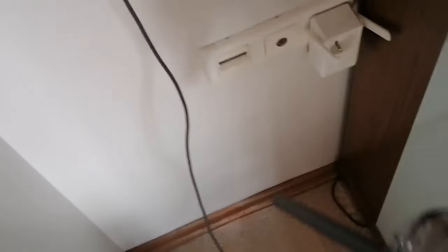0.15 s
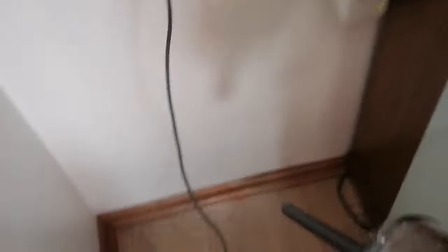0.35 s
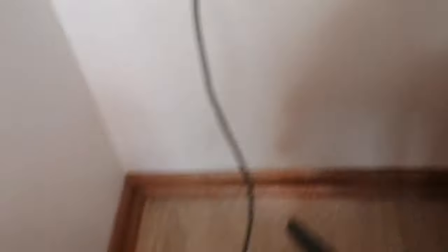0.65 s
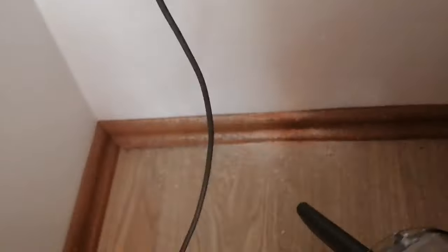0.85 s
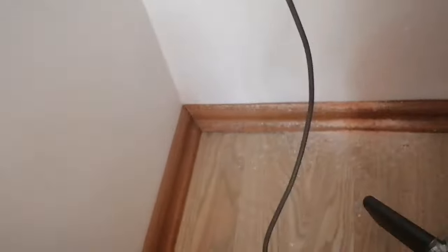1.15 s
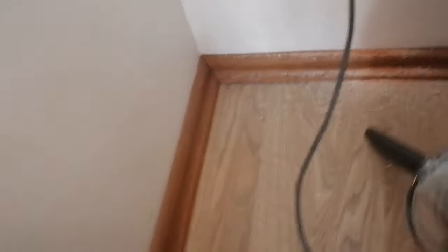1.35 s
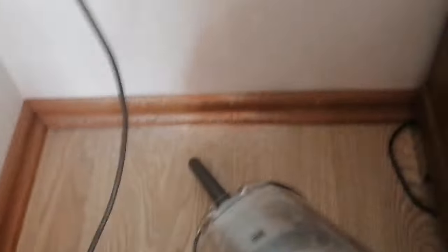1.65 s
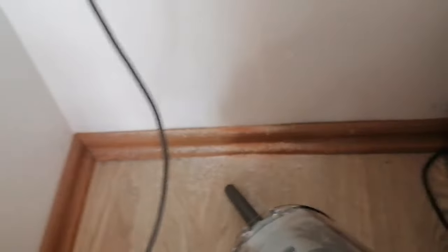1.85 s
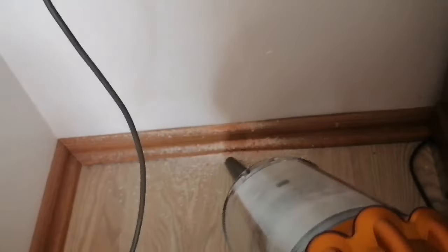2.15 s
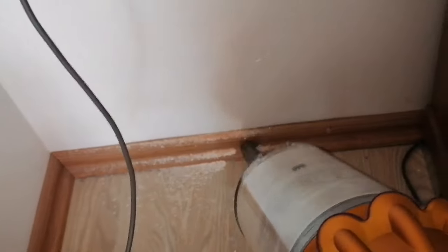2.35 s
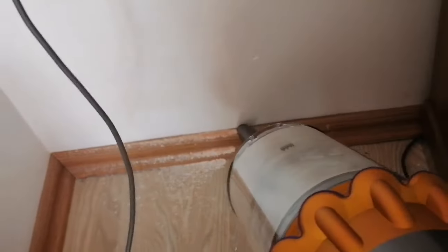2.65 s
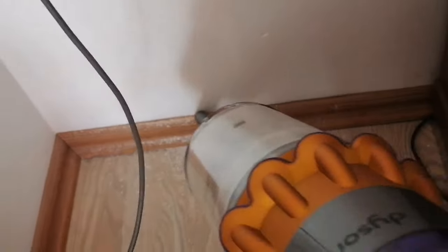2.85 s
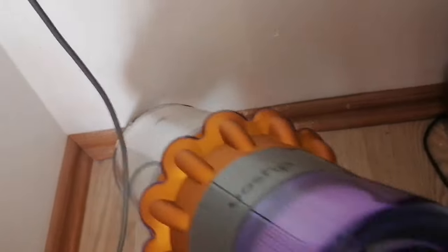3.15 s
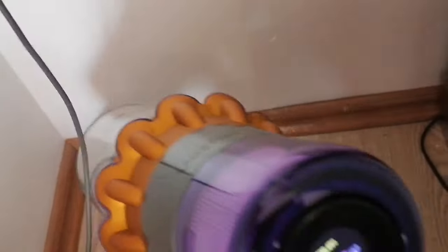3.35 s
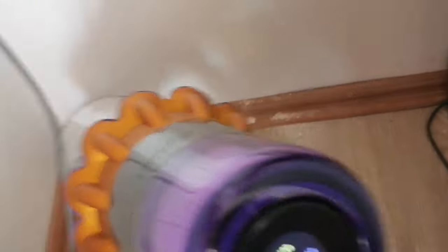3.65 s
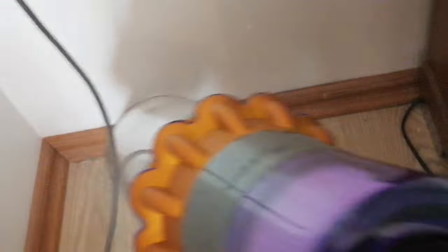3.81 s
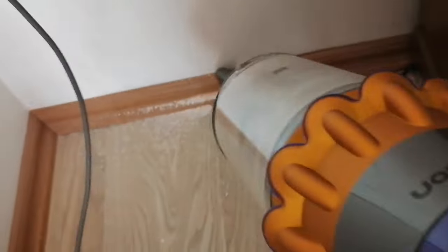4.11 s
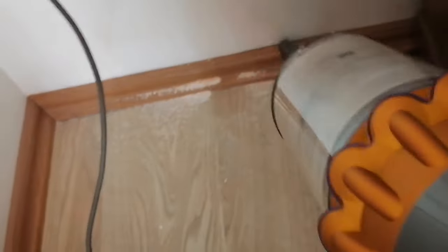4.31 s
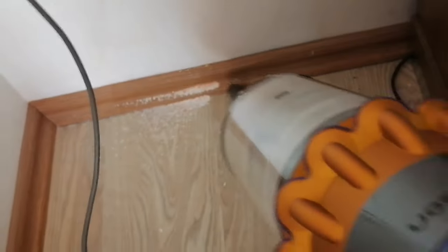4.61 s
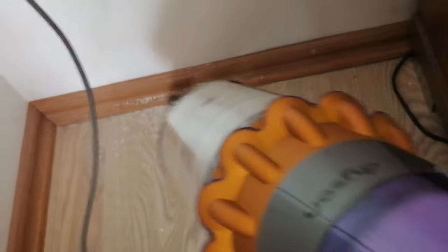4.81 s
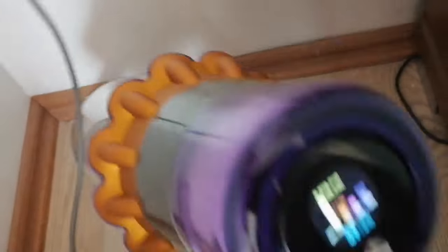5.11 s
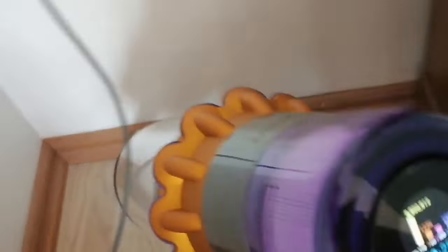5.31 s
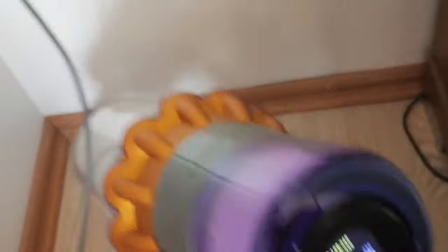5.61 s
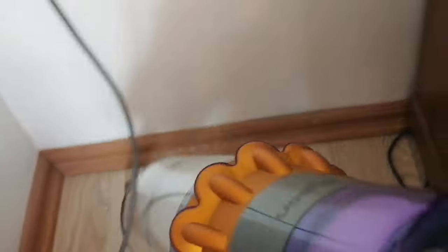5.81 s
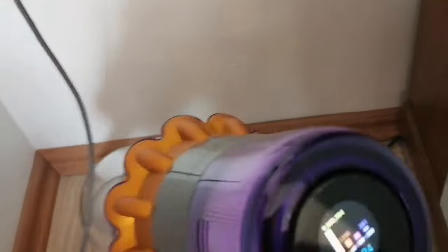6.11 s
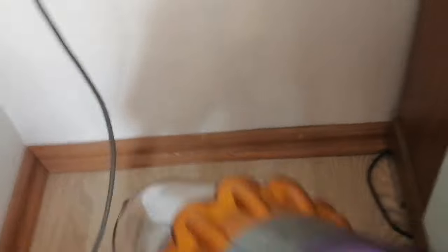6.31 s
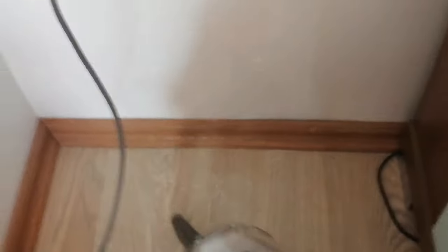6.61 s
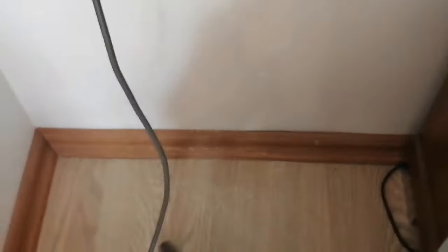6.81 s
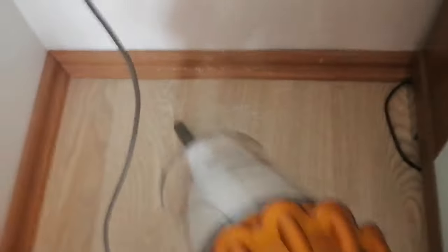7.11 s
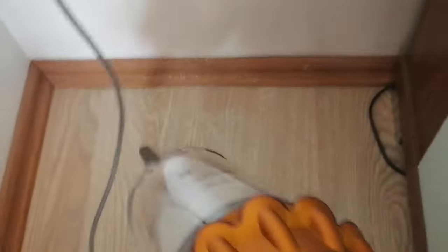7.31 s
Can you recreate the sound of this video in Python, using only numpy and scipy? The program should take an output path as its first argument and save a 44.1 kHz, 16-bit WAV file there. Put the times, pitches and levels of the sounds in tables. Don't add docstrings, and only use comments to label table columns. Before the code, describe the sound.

A cordless stick vacuum whirs briefly, then brakes with a quick falling growl and a clack. For over a second there is only faint room hum, ticks, light handling and a couple of knocks. A creaking trigger squeeze restarts it in a snap. The bright, breathy roar continues to the end, changing colour as it is turned close to the microphone indoors, with low wind puffs, hard plastic taps and a late airy whistle.

```python
import sys
import numpy as np
from scipy import signal
from scipy.fft import rfft, irfft, next_fast_len
from scipy.io import wavfile
from scipy.ndimage import uniform_filter1d, map_coordinates

SR = 44100
rng = np.random.default_rng(int(sys.argv[2]) if len(sys.argv) > 2 else 0)


def int16_out(signal):
    q = np.round(np.clip(np.atleast_2d(signal).T, -1, 1) * 32767)
    wavfile.write(sys.argv[1], SR, q.astype(np.int16))


def natural_amplitude(level_db):
    exponent = np.asarray(level_db, float) / 20
    return 10 ** exponent


N = 328986

# (time [s], shaft rate [Hz])
BRAKE = [(0, 1150), (.19, 1170), (.25, 766), (.285, 583), (.308, 440), (.322, 380), (.336, 308), (.37, 40)]
START = [(2.01, 39.9), (2.018, 129), (2.029, 337), (2.041, 515.6), (2.052, 710), (2.065, 1036),
         (2.099, 1135)]
RUN = [(2.14, 1122.5), (2.3, 1131.9), (2.8, 1154), (3.05, 1160), (3.75, 1166.3), (3.95, 1166.2),
       (4.1, 1167.5), (4.57, 1168.4), (4.7, 1171.1), (5.3, 1171.7), (5.62, 1168), (6.07, 1170),
       (6.2, 1175.5), (6.35, 1178.5), (6.75, 1172.5), (7.2, 1175.9), (7.46, 1172.7)]
FULL_HZ = 1170
# (time [s], nearness [dB], housing facing ports [dB], depth in corner [dB], left turn [dB])
POSE = [(0.05, 0.5, -3, -1.5, -2.5), (.3, 2, -5.5, -6, -0.5), (2.1, 1.5, 0, 3.5, -2.5),
        (2.35, 1, 2, -5.5, 0.5), (2.6, 1.5, -0.5, -8, -1.5), (2.85, -0.5, 1, 0, 1),
        (3.15, -0.5, -0.5, 6, 2.5), (3.44, -1, -0.5, 7.5, 2), (3.75, -1, 0, 4.5, 1.5),
        (4.0, -1.5, 1, 0, 3.5), (4.2, 0, 0, -7, 0.5), (4.65, -0.5, 1, -5, 2.5), (5.05, -1, -3, 0, 5.5),
        (5.5, -1, -1.5, 6.5, 2), (5.85, -0.5, -1, 1, 1.5), (6.1, -1.5, 0, -1, 4),
        (6.42, -0.5, -4, -3.5, 2.5), (6.7, 2, -2.5, 1.5, -0.5), (7, 3, -2.5, -1.5, -2.5),
        (7.25, 1.5, -2.5, -0.5, -0.5), (7.46, 1.5, 1, 4.5, -1.5)]
# (time [s], lag [ms])
LAG = [(0, 0.36), (2, 0.25), (3.5, 0.18), (4.8, 0.25), (5.1, -0.205), (6.3, -0.2), (6.6, 0.29)]
# (time [s], length [s], level [dB], left-right [dB])
BEAMS = [(2.272, 0.059, -45, 2), (2.413, 0.028, -41, 10), (2.562, 0.057, -47, -11), (2.748, 0.047, -50, 9),
         (2.9, 0.067, -46, 1), (3.238, 0.063, -49, 13), (3.454, 0.011, -48, 11), (3.54, 0.028, -48.5, 13),
         (3.615, 0.016, -51, 1), (3.748, 0.084, -48, 20), (3.95, 0.043, -56, 9), (4.077, 0.017, -50, -6),
         (4.202, 0.11, -43, 4), (4.463, 0.058, -46, 18), (4.56, 0.027, -58, 0), (4.7, 0.04, -48, -8),
         (4.884, 0.02, -54, 4), (5.159, 0.023, -50, 12), (5.263, 0.027, -47, 16), (5.365, 0.055, -47.5, 16),
         (5.478, 0.04, -49.5, 27), (5.726, 0.04, -46, 20), (5.875, 0.023, -51, 5), (6.059, 0.034, -44, 7),
         (6.23, 0.05, -52, 12), (6.38, 0.04, -54, 9), (6.825, 0.033, -51, 4), (6.937, 0.037, -57, 9),
         (7.122, 0.036, -52, 5), (7.254, 0.025, -58, 11), (7.322, 0.013, -54, 6), (7.397, 0.023, -60, 3)]
# (left [dB], right [dB])
BLADE_DB = (-52, -58)
EIGHTH_DB = (-53.5, -66)
# (time [s], level [dB])
SHAKE = [(2.14, -62), (2.4, -57), (2.55, -50), (2.8, -51), (2.95, -55), (3.3, -54), (3.7, -55), (4.0, -49),
         (4.35, -49), (4.7, -47), (4.85, -54), (5.1, -54), (5.5, -57), (5.7, -53), (6.1, -58), (6.4, -54),
         (6.7, -60), (7.46, -62)]
# (time [s], length [s], level [dB], left-right [dB])
DUCT_PASSES = [
    (.05, .06, -47, 6),
    (2.11, .03, -47, 3),
    (.26, .012, -53, 0),
    (.285, .012, -53, 0),
    (2.043, .007, -47, 0),
    (2.067, .007, -44, 0),
]
# (time [s], length [s], level [dB], left-right [dB])
GROWLS = [
    (.312, .006, -49, -4),
    (.322, .006, -35.5, -4),
    (.333, .005, -46, -4),
    (2.026, .007, -50, -4),
]
SWING_DB, SWING_POWER = -54, 1.6
# (level at full speed [dB], power of speed, left-right [dB], share of nearness, share of turn)
AIR = [
    (-47, 0.75, -3.5, 0.087, 0.63),
    (-42, 1.4, 0, 0.52, 0.9),
    (-41, 1.8, -1, 1, 0.49),
    (-41, 3, 5.5, 1.37, 1),
]
# (frequency [Hz], density [dB per Hz])
BODY = [(280, -59), (480, -6), (669, -3.5), (852, -6), (1140, 1), (1240, -6.5), (1400, -8), (1820, -8.5),
        (3080, -120)]
NOZZLE = [(820, -20), (1400, -7), (1570, -3.5), (1880, -1), (3060, 0), (3390, -1.5), (3800, -17.5),
          (4940, -51), (8360, -120)]
CYCLONE = [(2240, -37), (3800, -6), (5220, 0), (6120, -1), (8000, 1.5), (10400, -55), (17600, -120)]
EXHAUST = [(4710, -19.5), (8000, -12), (8350, 4), (9160, 3), (12700, -5), (13800, -2), (14800, -7.5),
           (15400, 2), (15900, -36)]
FACING_SHARE = (0.83, 0.81, 0.24, 0.051)
RAISED_DB = (0.13, -0.67, 0.24, -0.22)
# (time [s], level [dB], t60 [s]); its share in each air layer [dB]
PUFFS = [
    (.34, -53, 0.24),
    (1.986, -47.5, 0.29),
]
PUFF_DB = (-13, -16, -6, -18)
# (frequency [Hz], correlation)
ALIKE = [(40, .6), (120, .8), (280, .93), (600, .75), (1200, .6), (2500, .4), (6000, .3), (12000, .05)]
# (frequency [Hz], extra left-right [dB])
SHADOW = [(7500, 0.5), (9000, 5.5), (10500, 2.5), (12000, -1.5), (15000, -2)]
PORTS = [(150, 1.5), (260, 0.5), (420, 0), (740, 1.5), (930, -1), (1300, 1), (1900, -3.5), (2800, 0)]
# (time [s], length [s], frequency [Hz], left [dB], right [dB])
WALLS = [(2.213, 0.15, 2100, -3, -2.5), (2.496, 0.63, 932, 0, 6), (2.699, 0.64, 760, 2.5, 0.5),
         (2.603, .4, 530, -2, 3.5), (2.499, 0.078, 1800, 2, -3), (2.9, 0.44, 2280, 1, 2.5),
         (3.303, 0.23, 1629, -2, -1), (3.502, 0.2, 810, 4, 10.5), (3.55, 0.18, 990, 2, -1),
         (3.647, 0.19, 1370, 1, -1), (3.696, 0.18, 680, -2, 6), (3.947, 0.14, 497, -10, -11),
         (4.154, 0.2, 907, 5, 7.5), (4.302, 0.18, 602, -3, 3), (4.55, 0.48, 2040, -1, -1.5),
         (4.65, 0.4, 917, 3, 6), (4.6, .2, 1350, 8.5, 1), (5.05, 0.47, 645, 1.5, 5.5),
         (5.604, 0.16, 771, 4, 6), (5.605, 0.16, 2470, 2, 0.5), (6.099, 0.45, 1800, -11, -2.5),
         (6.1, .3, 4900, 7.5, -1), (6.2, 0.29, 1220, -11, -1), (6.546, 0.13, 2577, 1.5, -5),
         (6.5, 0.17, 4700, 2, 4), (6.896, 0.54, 764, 2.5, -5), (7.095, .35, 1050, 0, -1),
         (7.203, 0.29, 2050, -5, 1.5), (7.302, 0.19, 5270, 1, 5), (6.954, .15, 10500, -5, 4)]
WALL_OCTAVES = 0.15
# (frequency [Hz], density [dB per Hz])
BIN = [(120, -30), (200, -11), (335, -12), (385, 0), (430, -2), (480, -5), (620, -28), (1000, -120)]
POCKET = [(250, -60), (420, -12), (500, 0), (600, -2), (720, -14), (1200, -60)]
# (time [s], length [s], level [dB], left-right [dB])
BOOMS = [(3.42, 0.11, -56, -3), (5.6, .12, -50.5, 3), (7.4, 0.03, -46, -1)]
DRONE_DB, DRONE_PAN_DB, DRONE_POWER = -56, 1.5, 0.98
# (frequency [Hz], density [dB per Hz])
QUIET = [(15, -27), (30, -14), (60, -15), (150, -19), (300, -24), (700, -27), (1500, -34), (3200, -37.5),
         (3800, -47), (5300, -37), (10500, -35), (14500, -46), (15900, -40)]
# (time [s], length [s], level [dB], left-right [dB])
GUSTS = [(.09, 0.059, -57.5, -11), (.39, 0.034, -57, -13), (2.05, 0.031, -57, -2), (2.27, 0.028, -47, -7),
         (2.35, 0.032, -62, -25), (2.44, 0.024, -54.5, -22), (2.58, 0.024, -50.5, -12),
         (2.69, 0.027, -59.5, -21), (2.77, 0.046, -59.5, -12), (2.88, 0.031, -60, -8),
         (3.02, 0.052, -64, 0), (3.3, 0.21, -74, 0), (3.74, 0.058, -58, 2), (4.18, 0.025, -49, -17),
         (4.245, 0.026, -50, -23), (4.295, 0.026, -52.5, -19), (4.39, 0.021, -55, -14),
         (4.615, 0.024, -49, -14), (4.67, 0.029, -50, -3), (4.76, 0.042, -48.5, 2), (5.02, 0.039, -54, 4),
         (5.15, 0.058, -58, 3), (5.4, 0.15, -81, 2), (5.66, 0.053, -64, 5), (5.83, 0.028, -56, 0),
         (6.7, 0.11, -71, -4), (6.9, 0.056, -57.5, -3)]
# (frequency [Hz], density [dB per Hz])
RUMBLE = [(12, -29), (20, -24), (49, -1.5), (91, 1), (146, -4.5), (188, -12.5), (260, -13.5), (340, -13),
          (570, -120)]
BREEZE_DB, BREEZE_PAN_DB = -93, 8
# (time [s], peak [dB], click [dB], thump [dB], shell pitch [Hz])
BUMPS = [(0.34, -47.5, -1, -27, 600), (.349, -40, -8.5, -27, 605), (0.39, -61, -8, -19, 603),
         (0.888, -37, -5.5, -1, 370), (0.901, -44.5, -20, 7.5, 290), (1.569, -23.5, -22.5, -23.5, 586),
         (1.5755, -36, -20, -22, 560), (1.58, -38, -12, -20, 480), (1.586, -39, -18, -20, 600),
         (1.627, -48, -17, -20, 560), (1.887, -51, -14, -27, 620), (1.986, -45, 5, -38, 600),
         (2.015, -37, -2, -25, 620), (2.023, -36, -5, -23, 970), (2.98, -48, -30, 1.5, 460),
         (4.54, -26, -16, -29, 781), (4.55, -37, -15, -26, 565), (4.574, -30, -22, -27, 800),
         (5.8054, -19, -19, -38, 690), (5.807, -50, -30, 0.5, 400)]
# (frequency [Hz], level [dB], t60 [s])
SHELL = [(330, -14, .03), (434, -11, .035), (570, -9, .035), (770, -10, .022), (1015, -14, .02),
         (1620, -9, .04), (2100, -16, .03)]
# (frequency [Hz], density [dB per Hz])
CLICK = [(200, -21), (590, 6), (1000, -7.5), (2740, -6), (3220, -8.5), (4350, -18), (8410, -6.5),
         (14800, -22), (15900, -29)]
SHELL_DB_PER_OCTAVE, BLOW_DB, BLOW_CYCLES = 8, 6, 8
CRACK_DB, CRACK_T60_S, SCATTER_T60_S = 1.5, 0.015, .05
BOARD_HZ, SKIRTING_HZ = 68.6, 210
# (frequency [Hz], t60 [s])
CORNER = [(150, 0.25), (1500, 0.21), (10000, 0.05)]
# (frequency [Hz], density [dB per Hz])
TICKS = [(.378, -52, .03), (.426, -56, .03), (.553, -66, .02), (.669, -48, .03), (.77, -60, .02),
         (1.3125, -56.5, .03), (1.866, -67, 0.033), (1.887, -49, 0.14), (1.945, -50, .04),
         (1.967, -47, 0.039)]
JOINT = [(1200, -30), (2800, -8), (4000, -11), (5200, 10), (6800, -3), (8600, 0), (11000, -12),
         (15800, -17)]
# (frequency [Hz], density [dB per Hz])
RUSTLES = [(0.428, 0.03, -74), (0.498, 0.071, -71.5), (0.656, 0.047, -63), (0.766, 0.025, -68.5),
           (1.922, 0.02, -70), (1.977, 0.011, -63)]
CLOTH = [(500, -38), (1000, -14), (1980, -11), (2230, -16), (8200, -7), (15900, -8)]
# (frequency [Hz], density [dB per Hz])
SQUEEZE = [(1.76, -89), (1.8, -73), (1.816, -69), (1.826, -68), (1.84, -85), (1.882, -71), (1.89, -59),
           (1.93, -63), (1.97, -53.5), (1.98, -55.5), (2.0, -50)]
GRIP = [(250, -11), (420, -9), (600, 3), (900, -7), (1600, -19), (3000, -18), (5500, -31), (12000, -39),
        (15900, -40)]
# (time [s], peak [dB], frequency [Hz], cycles)
THUDS = [
    (2.039, -36.5, 79.4, 6.3),
    (4.534, -40.5, 76.6, 19),
    (4.565, -38, 90, 8.2),
    (5.809, -43, 75, 7.1),
]
# (time [s], frequency [Hz], level [dB])
TUBE = [(6.25, 3022, -71), (6.39, 3000, -42), (6.55, 2950, -44), (6.7, 2450, -46), (6.76, 2050, -51),
        (6.83, 1750, -47), (6.9, 1750, -41), (6.91, 2500, -44), (6.98, 2800, -38.5), (7.05, 2888, -38.5),
        (7.25, 3095, -36.5), (7.46, 3042, -37.5)]


def unit(x):
    return x / np.sqrt(np.mean(x ** 2) + 1e-20)


def along(points, hz):
    f, value = np.transpose(points)
    return np.interp(np.log(hz + 1), np.log(f + 1), value)


def curves(*spans):
    t = np.arange(N) / SR
    s, *columns = np.concatenate(spans).T
    gate = 0 < sum((t >= rows[0][0]) & (t <= rows[-1][0]) for rows in spans)
    return [np.interp(t, s, c) for c in columns], uniform_filter1d(1. * gate, size=800)


def ears(pan_db):
    return natural_amplitude(np.outer([.5, -.5], pan_db))


def wobble(rate):
    knots = rng.standard_normal(int(N * rate / SR) + 4)
    return map_coordinates(knots, [np.arange(N) * rate / SR])


def filtered(x, response):
    m = next_fast_len(x.shape[-1] + 8192)
    return irfft(rfft(x, m) * response(np.fft.rfftfreq(m, 1 / SR)), m)[..., :x.shape[-1]]


def swells(rows):
    t = np.arange(N) / SR
    return sum(natural_amplitude(db) * ears(pan_db) * np.exp(-((t - s) / length) ** 2) for s, length, db, pan_db in rows)


def rush(spectrum, patchy_db, drift_db, alike=ALIKE):
    def mid_side(hz):
        turn = np.arccos(np.clip(along(alike, hz), -1, 1)) / 2
        return natural_amplitude(along(spectrum, hz)) * np.array([np.cos(turn), np.sin(turn)])

    mid, side = filtered(rng.standard_normal((2, N)), mid_side)
    hz, t, z = signal.stft([mid + side, mid - side], SR, nperseg=512)
    lag_s = np.interp(t, *np.transpose(LAG)) / 1000
    z[0] *= np.exp(-2j * np.pi * np.outer(hz, lag_s))

    def blur(tall, wide):
        patches = uniform_filter1d(rng.standard_normal(z.shape), tall, axis=1)
        return unit(uniform_filter1d(patches, wide, axis=2))

    gain = natural_amplitude(patchy_db * blur(tall=6, wide=8) + drift_db * blur(tall=4, wide=70))
    gain = gain * ears(along(SHADOW, hz) + along(PORTS, hz))[..., None]
    pair = signal.istft(z * gain, nperseg=512)[1][:, :N]
    return pair / np.sqrt(np.mean(pair.mean(0) ** 2))


def shaft():
    (hz,), turning = curves(BRAKE, START + RUN)
    return hz, turning * hz / FULL_HZ


def tone(hz, order, db, jitter, echo, rate=30):
    def per_ear(speed):
        return np.array([wobble(speed), wobble(speed)])

    phase = 2 * np.pi * order * np.cumsum(hz) / SR
    phase = phase + jitter * per_ear(rate) + .55 * per_ear(1.5)
    wave = np.sin(phase) + echo * np.sin(phase + 3.1 * per_ear(5.5))
    return np.sqrt(2 / (1 + echo ** 2)) * natural_amplitude(db) * wave


def motor():
    (hz, speed), running = shaft(), curves(RUN)[1]
    blade_gain = natural_amplitude(np.reshape(BLADE_DB, (2, 1))) + natural_amplitude(1.5) * swells(BEAMS)
    steady = blade_gain * tone(hz, order=9, db=0, jitter=.15, echo=.2)
    eighth_db = np.reshape(EIGHTH_DB, (2, 1)) + 3.5 * wobble(6)
    steady += tone(hz, order=8, db=eighth_db, jitter=.25, echo=.7)
    steady += tone(hz, order=1, db=curves(SHAKE)[0][0] - 1 + 2 * wobble(7), jitter=.5, echo=.4)
    glide = tone(hz, order=9, db=0, jitter=1.8, echo=.5, rate=300)
    swing = natural_amplitude(SWING_DB) * glide + tone(hz, order=1, db=SWING_DB - 14, jitter=.22, echo=.25)
    growl = swells(DUCT_PASSES) * glide
    growl += swells(GROWLS) * tone(hz, order=6, db=0, jitter=1.9, echo=.3, rate=300)
    return steady * running + swing * (1 - running) * speed ** SWING_POWER + growl


def air():
    (near_db, facing_db, _, turn_db), speed = curves(POSE)[0], shaft()[1]
    t = np.arange(N) / SR
    puff = sum((t > s) * natural_amplitude(db - 60 * np.abs(t - s) / t60) for s, db, t60 in PUFFS)
    flutter, out = 0.56 * wobble(45), 0
    layers = zip((BODY, NOZZLE, CYCLONE, EXHAUST), AIR, PUFF_DB, FACING_SHARE, RAISED_DB)
    for colour, (db, power, pan_db, near, turn), puff_db, facing, raised_db in layers:
        held_db = near * near_db + facing * facing_db + raised_db * (t < 1)
        level = natural_amplitude(db + held_db + flutter) * speed ** power + natural_amplitude(puff_db) * puff
        out = out + level * ears(pan_db + turn * turn_db) * rush(colour, patchy_db=1.35, drift_db=1.5)
    return out


def walls(x):
    hz, t, z = signal.stft(x, SR, nperseg=1024)
    db = 0
    for s, length, f, left_db, right_db in WALLS:
        band = np.exp(-(np.log2((hz + 1) / f) / WALL_OCTAVES) ** 2)
        spell = np.exp(-((t - s) / length) ** 2)
        db = db + np.multiply.outer([left_db, right_db], np.outer(band, spell))
    return signal.istft(z * natural_amplitude(db), nperseg=1024)[1][:, :N]


def drone():
    _, _, depth_db, turn_db = curves(POSE)[0]
    level = natural_amplitude(DRONE_DB + depth_db) * shaft()[1] ** DRONE_POWER
    hollow = level * ears(DRONE_PAN_DB + 0.72 * turn_db) * rush(BIN, patchy_db=3.5, drift_db=-0.7)
    return hollow + swells(BOOMS) * rush(POCKET, patchy_db=-0.2, drift_db=2.5)


def room_tone():
    phase = 2 * np.pi * 101 * np.arange(N) / SR
    hum = natural_amplitude(-70 + 0.49 * wobble(13)) * np.sin(phase + 0.25 * wobble(7.3))
    return hum + natural_amplitude(-70 + 0.4 * wobble(1.3)) * rush(QUIET, patchy_db=1.5, drift_db=1.5)


def wind():
    breeze = natural_amplitude(BREEZE_DB + 0.83 * wobble(6)) * ears(BREEZE_PAN_DB) * shaft()[1]
    lumps = natural_amplitude(3.5 * wobble(23.12) + 0.8 * np.array([wobble(34), wobble(20)]))
    pressure = rush(RUMBLE, patchy_db=.8, drift_db=.3, alike=[(30, .45), (200, .85)])
    return (swells(GUSTS) + breeze) * lumps * pressure


def bumps():
    out, t = np.zeros((2, N + SR)), np.arange(SR // 4) / SR

    def ring(hz, cycles):
        return -natural_amplitude(-60 * t * hz / cycles) * np.sin(2 * np.pi * hz * t) * (1 - np.exp(-t / .0012))

    click_fade = natural_amplitude(CRACK_DB - 60 * t / CRACK_T60_S) + natural_amplitude(-2.5 - 60 * t / SCATTER_T60_S)
    for s, db, click_db, thump_db, hz in BUMPS:
        shell = natural_amplitude(BLOW_DB) * ring(hz, BLOW_CYCLES)
        for f, level, t60 in SHELL:
            shell += natural_amplitude(level - SHELL_DB_PER_OCTAVE * abs(np.log2(f / hz))) * ring(f, f * t60)

        def dull(f):
            return natural_amplitude(along(CLICK, f) + 0.6 * click_db * np.log2(1 + f / 2500))

        click = unit(filtered(rng.standard_normal((2, len(t))), dull)) * click_fade
        if hz < 450:
            thump = -np.pad(ring(BOARD_HZ, 6.7), (130, 0))[:len(t)]
        else:
            thump = ring(SKIRTING_HZ, 15)
        thump = thump + natural_amplitude(-0.5) * ring(202.3, 16.4)
        knock = natural_amplitude(-1) * shell + natural_amplitude(click_db + 2.5) * click + natural_amplitude(thump_db + 3) * thump
        out[:, round((s + .0016) * SR):][:, :len(t)] += natural_amplitude(db) * knock
    return out[:, :N]


def corner(x):
    hz, t, z = signal.stft(rng.standard_normal((2, SR // 3)), SR, nperseg=256)
    decay = natural_amplitude(-60 * t / along(CORNER, hz)[:, None])
    tail = signal.istft(z * decay, SR, nperseg=256)[1]
    return signal.fftconvolve(x, tail / np.linalg.norm(tail[0]), axes=1)[:, :N]


def valve():
    t = np.clip(np.arange(N) / SR - .358, 0, None)
    return natural_amplitude(-51.5 - 60 * t / 1.1 + .6 * wobble(27)) * np.sin(2 * np.pi * (140 * t - 20 * t * t))


def ticks():
    t = np.arange(N) / SR
    snap = sum((t > s) * natural_amplitude(db - 11 - 60 * np.abs(t - s) / t60) for s, db, t60 in TICKS)
    return snap * rush(JOINT, patchy_db=0, drift_db=0)


def rustles():
    t = np.arange(N) / SR
    swell = sum(natural_amplitude(db) * np.exp(-((t - s) / length) ** 2) for s, length, db in RUSTLES)
    return swell * natural_amplitude(2 * wobble(60)) * rush(CLOTH, patchy_db=1.5, drift_db=.5)


def trigger():
    (db,), on = curves(SQUEEZE)
    t = np.arange(N) / SR
    switching = natural_amplitude(-51) * np.exp(-((t - 2.008) / 0.0073) ** 2) * np.sin(2 * np.pi * 8000 * t)
    creak = natural_amplitude(db + 3 + 1.5 * wobble(90)) * rush(GRIP, patchy_db=1.5, drift_db=0)
    return on * creak + switching


def thuds():
    t, out = np.arange(N) / SR, 0
    for s, db, hz, cycles in THUDS:
        fade = (t > s) * natural_amplitude(db - 60 * np.abs(t - s) * hz / cycles)
        out = out + fade * np.sin(2 * np.pi * hz * (t - s))
    return out * ears(-8)


def tube():
    (hz, db), on = curves(TUBE)
    slow = unit(filtered(rng.standard_normal((2, 2, N)), lambda f: 1 / (1 + (f / 260) ** 2)))
    phase = 2 * np.pi * np.cumsum(hz) / SR
    return on * natural_amplitude(db) * ears(-1.17) * (slow[0] * np.cos(phase) + slow[1] * np.sin(phase))


def scene():
    knocks = bumps()
    vacuum = motor() + walls(air()) + drone() + valve() + trigger() + tube()
    handling = knocks + natural_amplitude(-19) * corner(knocks) + ticks() + rustles() + thuds()
    return vacuum + wind() + handling + room_tone()


def roll_off(x):
    return signal.sosfilt(signal.butter(12, 16640, fs=SR, output="sos"), x)


def record(dry):
    mix = filtered(dry, lambda hz: hz < 15800)
    return roll_off(mix)


dry = scene()
out = record(dry)
int16_out(out)
```